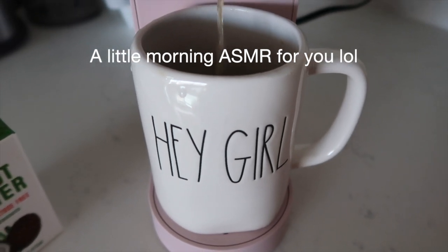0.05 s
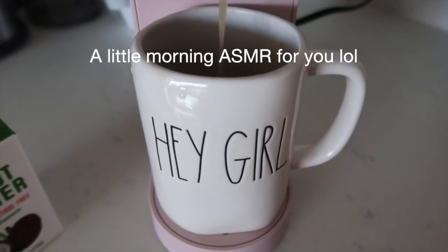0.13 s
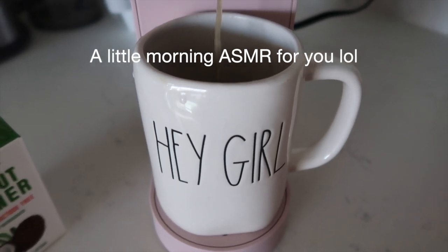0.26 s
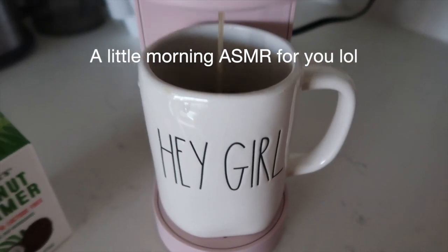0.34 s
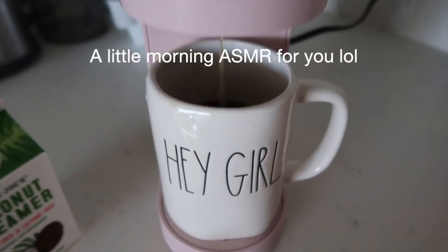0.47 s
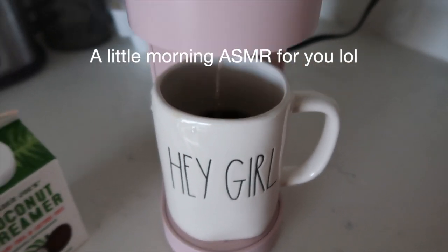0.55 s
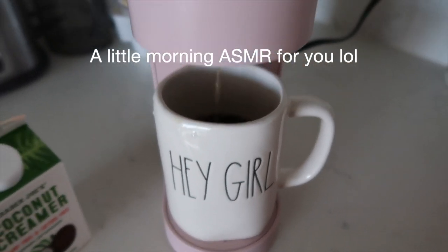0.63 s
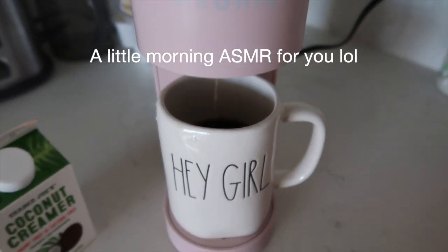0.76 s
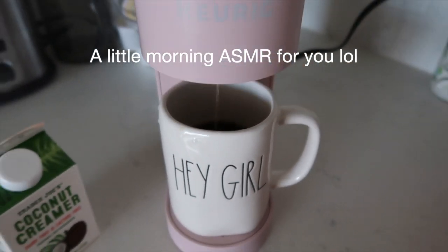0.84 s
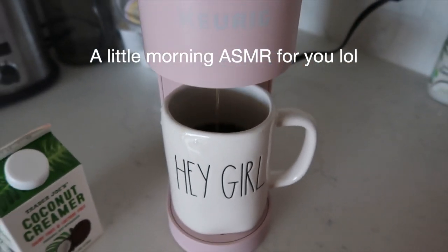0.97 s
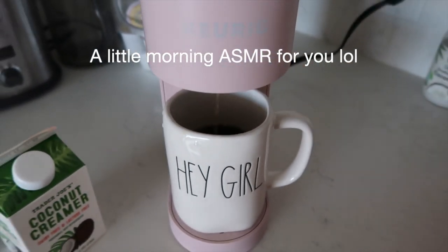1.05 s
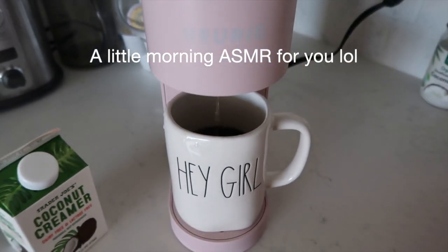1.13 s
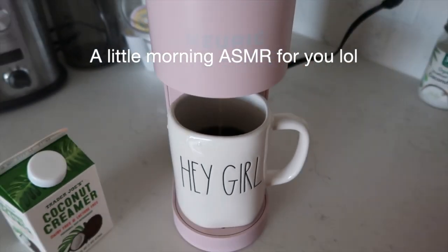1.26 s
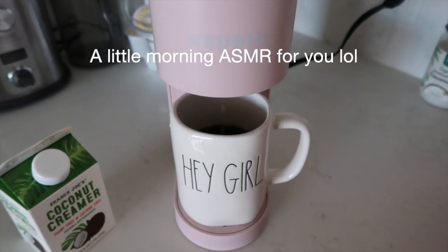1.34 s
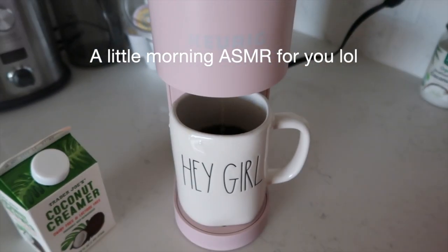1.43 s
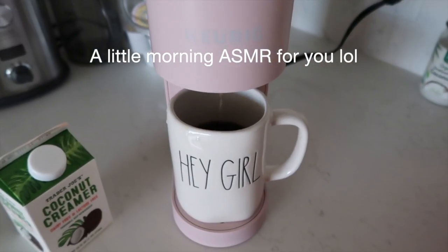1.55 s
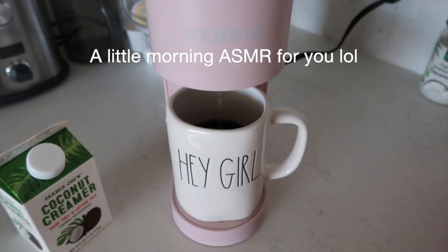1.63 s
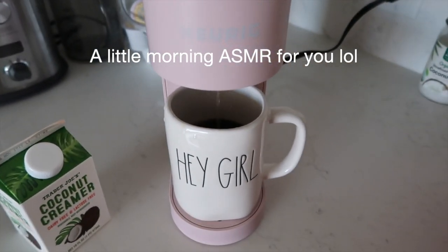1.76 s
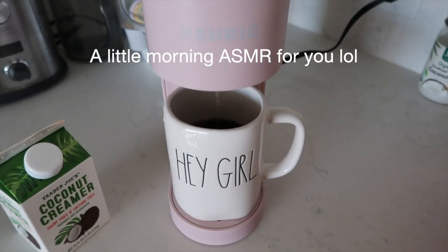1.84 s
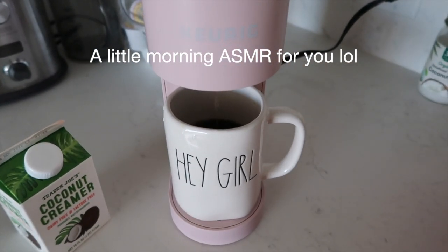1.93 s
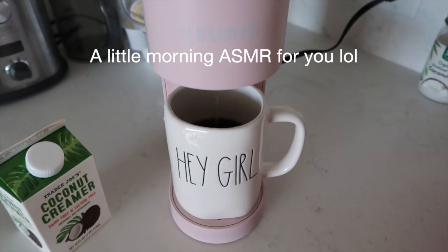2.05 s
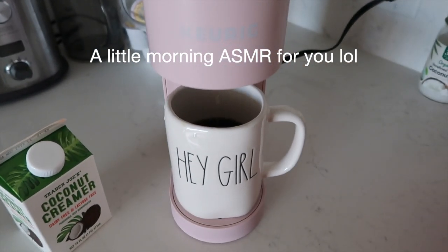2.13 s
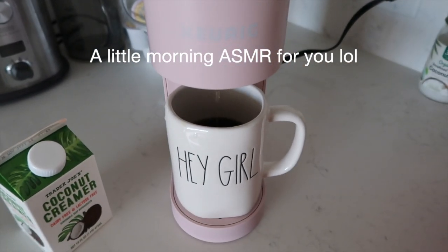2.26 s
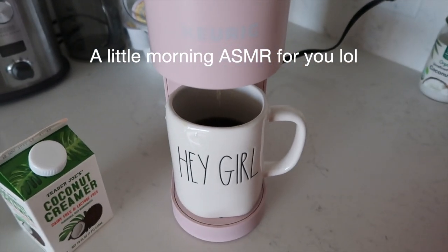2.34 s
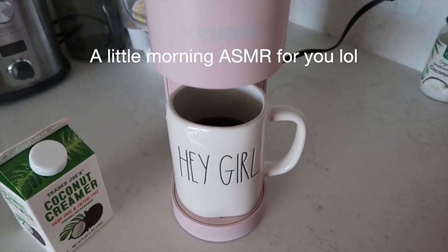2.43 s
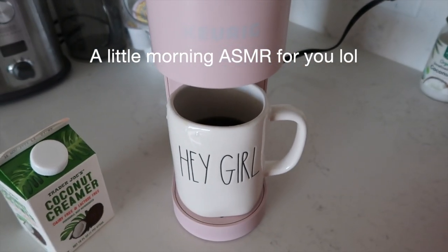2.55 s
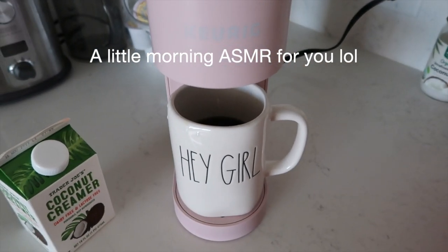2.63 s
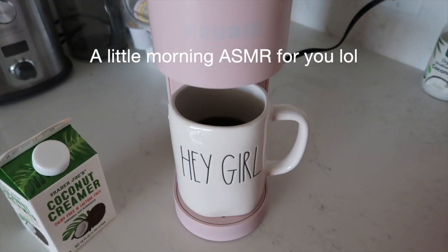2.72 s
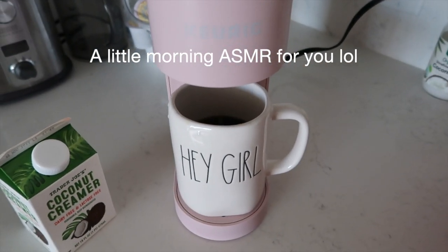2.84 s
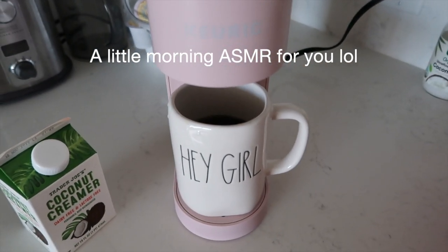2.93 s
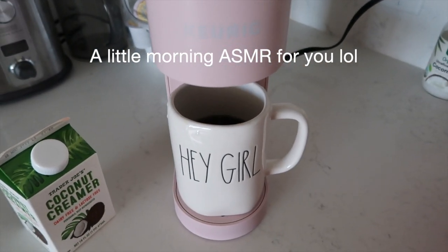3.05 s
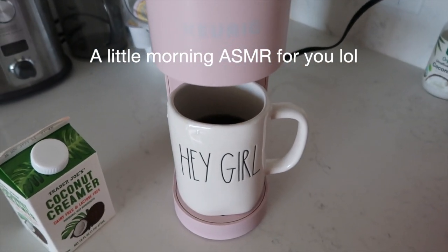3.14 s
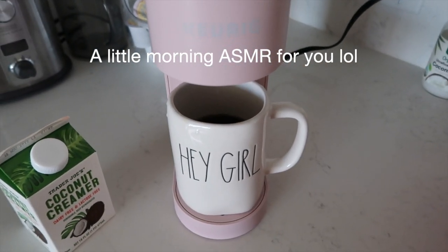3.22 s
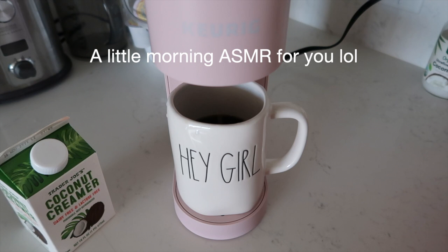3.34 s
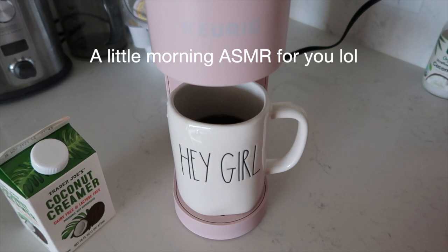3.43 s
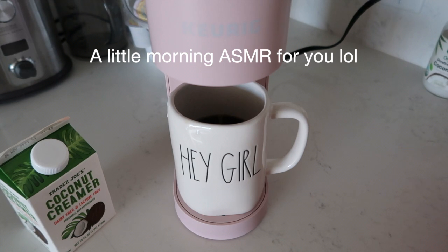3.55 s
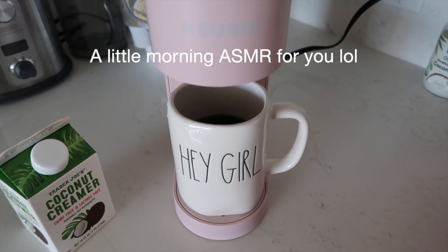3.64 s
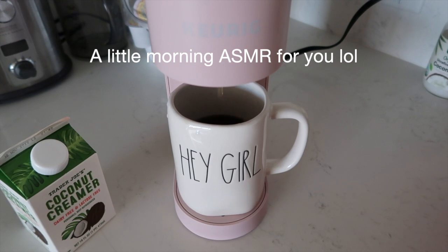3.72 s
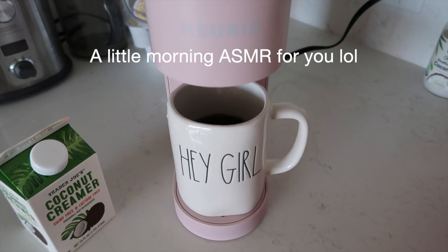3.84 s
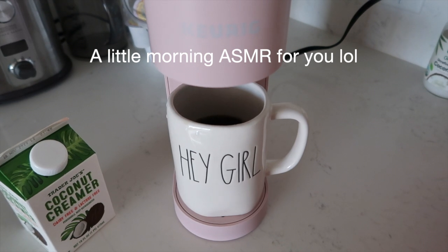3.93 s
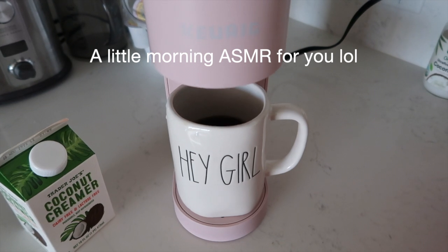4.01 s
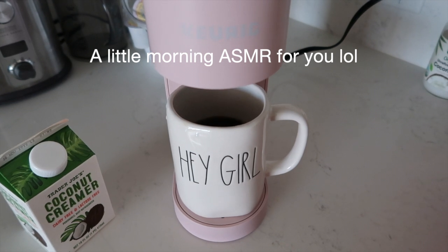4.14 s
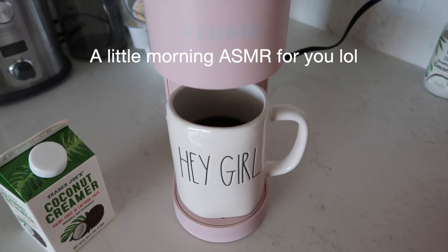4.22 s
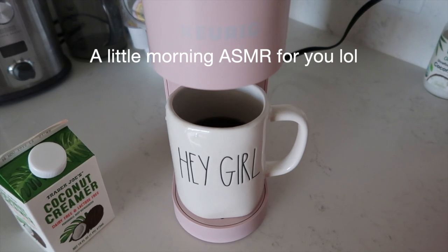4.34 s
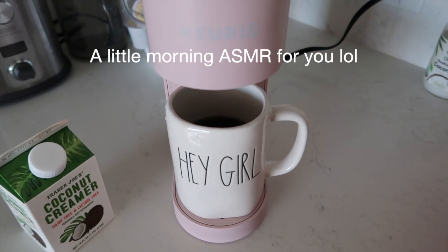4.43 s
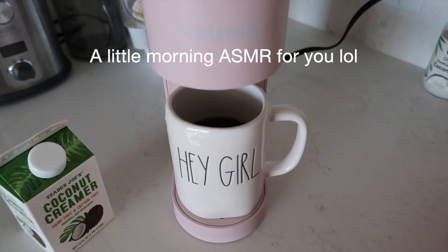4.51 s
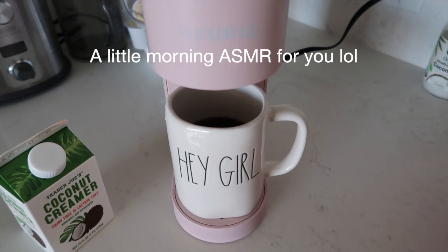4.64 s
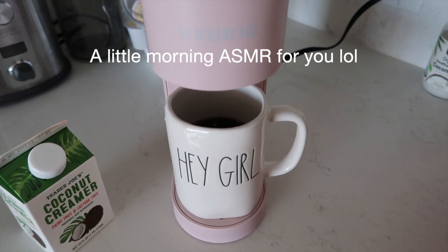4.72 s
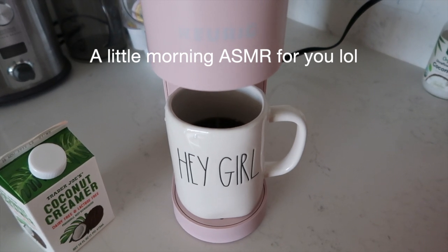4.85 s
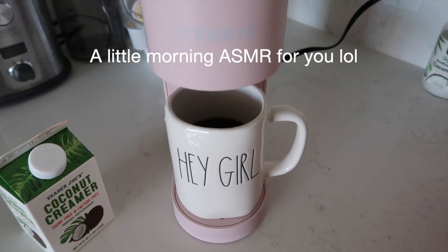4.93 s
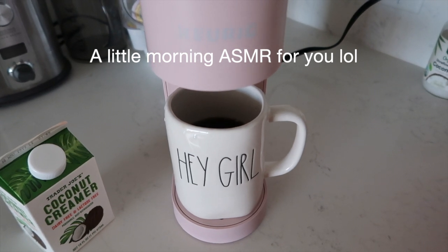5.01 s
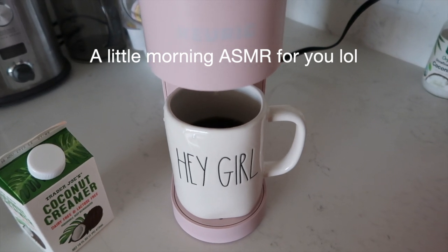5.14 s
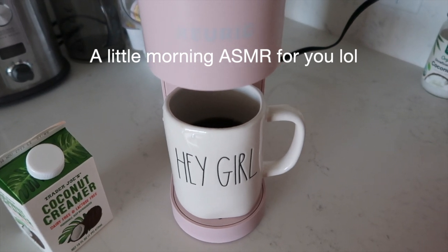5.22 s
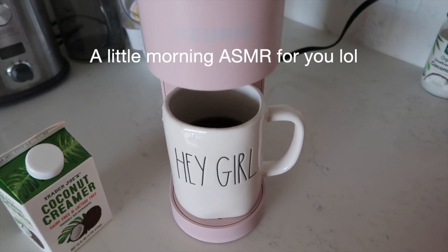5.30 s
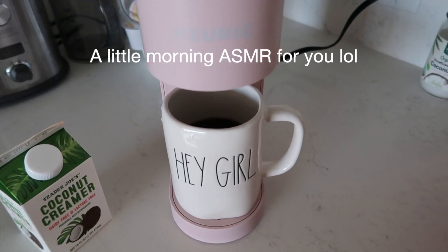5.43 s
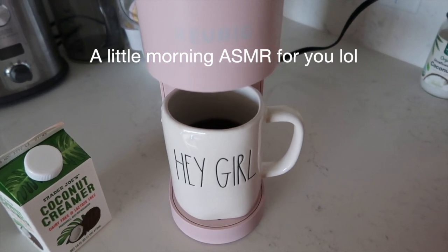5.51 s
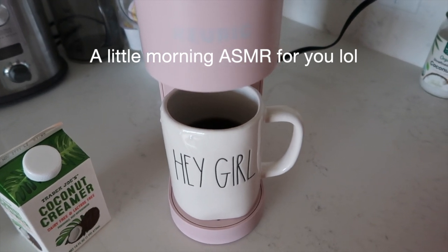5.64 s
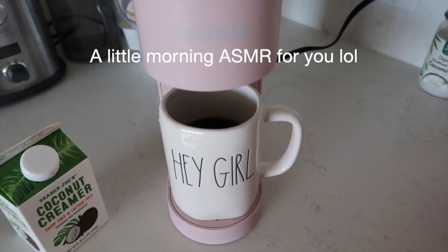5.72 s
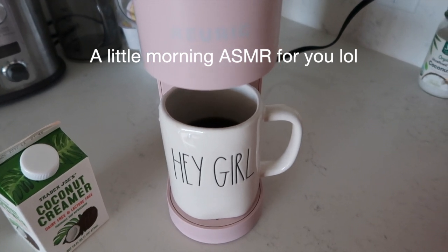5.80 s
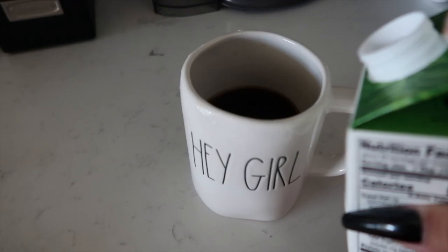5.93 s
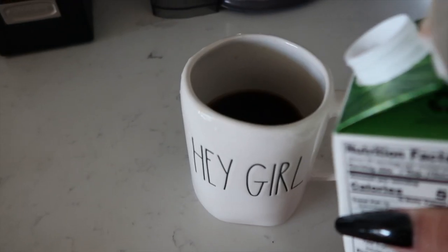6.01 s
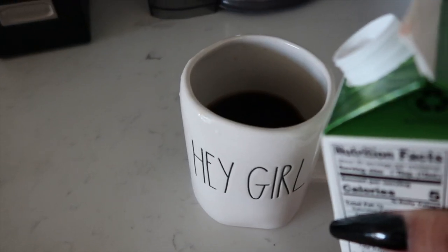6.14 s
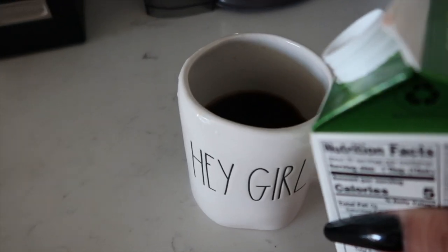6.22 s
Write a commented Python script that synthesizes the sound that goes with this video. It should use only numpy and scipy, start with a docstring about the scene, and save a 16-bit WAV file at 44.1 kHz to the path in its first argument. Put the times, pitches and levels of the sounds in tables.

```python
"""In a kitchen, a small coffee maker empties itself into a mug, close to two microphone ports.
Its pump hums while it blows the last water, then air, through the pod: shaped noise gives the spray
and hiss, damped tones the gurgle and bubbles. A relay clicks as ringing modes, the pump hum runs down and
the pressure sighs away as noise and whistles. A short silence, then quiet room tone with a faint high whine."""
import sys
import numpy as np
from scipy import signal
from scipy.fft import rfft, irfft, next_fast_len
from scipy.io import wavfile
from scipy.ndimage import uniform_filter1d, map_coordinates

SR = 44100
rng = np.random.default_rng(int(sys.argv[2]) if len(sys.argv) > 2 else 0)


def materialize(psi):
    """Save the field psi as 16-bit PCM at rate SR to the path in sys.argv[1].

    A 1-D psi becomes a single channel; in a 2-D psi each row is a channel.
    """
    bounded = np.clip(np.atleast_2d(psi).T, -1, 1)
    quanta = np.round(bounded * 32767).astype(np.int16)
    wavfile.write(sys.argv[1], SR, quanta)


N = 276507
TIME = np.arange(N) / SR

# The pump as it works and runs down: time_s, stroke_rate_hz, hum_db, buzz_db
PUMP_RUN = [(0, 95.43, -32.5, -36.5), (.7, 94.7, -34, -37.5), (1.2, 96.7, -37.5, -40.5),
            (1.6, 95.23, -37.5, -39.5), (2, 96.8, -37.5, -38.5), (2.8, 96.86, -37.5, -39),
            (3.5, 96.08, -38, -39), (4.3, 96.15, -36.5, -39.5), (4.9, 95.7, -37, -39.5),
            (4.95, 90.7, -34, -39), (5.0, 89.8, -43, -54), (5.06, 86, -50, -59), (5.2, 81.4, -53, -54)]
# A drop chokes the jet, then bursts: burst_s, choke_length_s, choke_depth_db, burst_level_db
DROP_SPITS = [(0.178, 0.007, 10, -38), (0.355, 0.047, 5, -26), (0.511, 0.026, 5, -40),
              (0.67, 0.022, 5, -30), (0.941, 0.015, 6, -27), (1.04, 0.015, 9, -30), (1.169, .02, 5, -33),
              (1.222, 0.04, 6, -45), (1.241, .02, 3, -33), (1.277, 0.017, 4, -39), (1.397, 0.054, 10, -35),
              (1.552, .02, 7, -28), (1.599, 0.028, 7, -43), (1.836, .03, 5, -36), (1.929, 0.033, 7, -38),
              (2.002, 0.095, 4, -41), (2.096, .02, 1, -37), (2.249, 0.067, 6.5, -49),
              (2.318, 0.019, 3, -40), (2.546, 0.039, 9, -41), (2.943, 0.03, 9, -44),
              (3.031, 0.05, 2.5, -34), (3.278, 0.11, 7.5, -60), (3.362, 0.021, 1, -43),
              (3.441, .02, -4, -32.5), (3.657, 0.091, 4.5, -37), (3.886, 0.053, 5, -50),
              (3.941, 0.018, -2, -34), (3.97, 0.014, 3, -34), (4.021, 0.024, 8, -44),
              (4.197, 0.18, 8.5, -31.5), (4.351, 0.053, 9, -51), (4.561, 0.028, 6, -41),
              (4.612, 0.022, 6, -57), (4.897, 0.024, 2, -60)]
# Likeness of the two ports for air, vent and murmur: frequency_hz, likeness (0-1)
AIR_LIKENESS = [(60, 0.99), (400, 0.98), (1500, 0.97), (2100, 0.94), (2500, 0.99), (3200, 0.95),
                (4000, 0.81), (4600, 0.99), (5100, 0.42), (6500, 0.28), (9000, 0.5), (11000, 0.29),
                (14500, .6)]
# The short silence: from_s, to_s
SILENT_SPAN = (5.855, 5.923)


def amp(db):
    """Decibels to gain."""
    return 10 ** (np.asarray(db) / 20)


def unit(x):
    """x at rms 1."""
    return x / np.sqrt(np.mean(np.abs(x) ** 2) + 1e-20)


def along(points, hz):
    """Interpolate (Hz, value) points on a log frequency axis."""
    f, v = np.transpose(points)
    return np.interp(np.log(hz + 1), np.log(f + 1), v)


def curves(rows):
    """One value per sample for each column after the time."""
    s, *cols = np.transpose(rows)
    return [np.interp(TIME, s, c) for c in cols]


def fade(start, length):
    """1 until start, then down to 0 over length, both in s."""
    return np.clip(1 - (TIME - start) / length, 0, 1)


def wobble(rate):
    """A smooth random curve, rate knots a second."""
    coarse = TIME[::32]
    knots = rng.standard_normal(int(N * rate / SR) + 4)
    return np.interp(TIME, coarse, map_coordinates(knots, [coarse * rate]))


def filtered(x, response):
    """x through a filter given as a real or complex function of frequency."""
    m = next_fast_len(N + SR // 4)
    return irfft(rfft(x, m) * response(np.fft.rfftfreq(m, 1 / SR)), m)[..., :N]


def resonant(peaks, base_db):
    """Gain of resonances standing on a flat base."""
    def gain(f):
        power = sum(amp(2 * db) / (1 + (2 * (f - c) / w) ** 2) for c, w, db in peaks)
        return np.sqrt(amp(2 * base_db) + power)
    return gain


def band(lo_hz, hi_hz):
    """Gain of a band with soft edges."""
    return lambda f: 1 / np.sqrt((1 + (lo_hz / (f + 1)) ** 4) * (1 + (f / hi_hz) ** 4))


def rush(gain, alike, patchy_db):
    """Stereo noise of rms 1 with patches of random gain; a mid-side mix sets the likeness of the ports."""
    z = signal.stft(rng.standard_normal((2, N)), nperseg=512)[2]
    field = uniform_filter1d(rng.standard_normal(z.shape[1:]), size=6, axis=0)
    field = uniform_filter1d(field, size=6, axis=1)
    pair = signal.istft(z * amp(patchy_db * unit(field)), nperseg=512)[1][:, :N]

    def mid_side_gain(hz):
        turn = np.arccos(np.clip(along(alike, hz), -1, 1)) / 2
        return gain(hz) * np.array([np.cos(turn), np.sin(turn)])

    mid, side = filtered(pair, mid_side_gain)
    return unit(np.array([mid + side, mid - side]))


def narrow(hz, width_hz, steady):
    """Noise in a steep resonance whose centre follows the curve hz; steady 0-1 evens out its swells."""
    pole = np.exp(-np.pi * width_hz / SR)
    noise = rng.standard_normal(N) + 1j * rng.standard_normal(N)
    swell = signal.lfilter([1], [1, -2 * pole, pole * pole], noise)
    swell = swell / (np.abs(unit(swell)) + 0.35) ** np.clip(steady, 0, 1)
    return unit(np.real(swell * np.exp(2j * np.pi * np.cumsum(hz) / SR)))


def kitchen():
    """Steady noise as room tone, a little louder after the silence, with a whine, an airy tone and a tick."""
    # Colour of the room tone: frequency_hz, relative_level_db (per Hz)
    room_colour = [(12, -45), (25, -8.5), (60, -7.5), (85, 1.5), (125, -8.5), (170, -9.5), (230, -6.5),
                   (480, -12.5), (610, -19.5), (1240, -23), (2150, -29), (11600, -46), (14900, -62)]
    # Likeness of the ports for the room: frequency_hz, likeness (0-1)
    room_likeness = [(25, .999), (60, 1), (180, 0.9), (540, 0.5), (1610, 0.12), (14500, 0.18)]
    # Faint high whine: pitch_hz, level_db
    whine_tones = [(13006, -80)]
    # A fingernail on the carton: start_s, level_db
    nail_ticks = [(5.972, -52.5)]
    # Tones of the carton: pitch_hz, relative_level_db
    carton_tones = [(3500, 1), (3920, -2)]
    # Airy tone in the room: pitch_hz, width_hz, relative_level_db
    murmur_peaks = [(800, 150, -3), (1290, 70, 3)]
    # Level of the airy tone: time_s, level_db
    murmur_points = [(5.92, -64), (6.1, -63), (6.14, -72), (6.18, -62), (6.27, -67)]
    later = TIME > SILENT_SPAN[1]
    room = rush(lambda f: amp(along(room_colour, f)), room_likeness, patchy_db=0.0)
    room = amp(-46.5 + 0.52 * later) * room
    whine = sum(np.sqrt(2) * amp(db + .9 * wobble(30)) * np.sin(2 * np.pi * hz * TIME)
                for hz, db in whine_tones)
    tick = np.zeros(N)
    for s, db in nail_ticks:
        decay = (TIME > s) * amp(db - 60 * np.abs(TIME - s) / .03)
        tick += decay * sum(amp(level) * np.sin(2 * np.pi * hz * (TIME - s)) for hz, level in carton_tones)
    murmur = rush(resonant(murmur_peaks, base_db=-30), AIR_LIKENESS, patchy_db=2.5)
    murmur = amp(curves(murmur_points)[0]) * murmur
    return room + (whine + murmur) * later + tick


def relay():
    """Each contact rings the relay case and rattles for a moment; the plastic around it dulls the top."""
    # Contact and bounces: start_s, relative_level_db
    contacts = [(4.903, -4), (4.911, -27), (4.92, -27)]
    # Modes of the case: pitch_hz, relative_level_db, t60_s
    case_modes = [(776, -2, 0.042), (1050, -9, .03), (1401, -3, 0.025), (2225, -26, 0.15),
                  (3260, -10.5, 0.035), (3607, -14, 0.038), (5650, -30, 0.095), (6330, -23, 0.086),
                  (6864, -18, 0.11), (8700, -13, 0.06)]
    out, t = np.zeros((2, N)), TIME[:SR // 4]
    for s, db in contacts:
        ring = sum(amp(level - 60 * t / t60) * np.sin(2 * np.pi * hz * t) for hz, level, t60 in case_modes)
        # mostly common to both ports
        noise = rng.standard_normal(len(t)) + 0.14 * rng.standard_normal((2, len(t)))
        rattle = amp(-5.0 - 60 * t / 0.067) * noise
        start = round(s * SR)
        out[:, start:start + len(t)] += amp(db - 8.0) * (ring + rattle) * (1 - np.exp(-t / 0.002))
    return signal.lfilter(*signal.butter(2, 11000, fs=SR), out)


def sigh():
    """As the pump runs down, pressure leaks through the vent: fading noise with two faint whistles."""
    # Resonances of the vent: pitch_hz, width_hz, relative_level_db
    vent_peaks = [(300, 170, 12.5), (840, 550, 4.5), (1340, 180, 9), (3400, 790, -7.5), (2160, 46, 3),
                  (2650, 54, -3), (2930, 43, 2)]
    since = np.maximum(TIME - 4.93, 0)  # s
    vent = resonant(vent_peaks, base_db=-14.0)
    low = rush(lambda f: vent(f) * band(110, 4200)(f), AIR_LIKENESS, patchy_db=2.5)
    high = rush(band(2300, 5700), AIR_LIKENESS, patchy_db=1.5)
    whistle = narrow(1390 - 130 * since, width_hz=106, steady=.97)
    low_whistle = narrow(860 + 0 * since, width_hz=120, steady=.5)
    # starting levels in dB, falling in dB per s
    leak = amp(-37.5 - 40 * since) * low + amp(-44 - 120 * since) * high
    slackening_db = 6 * (1.0 - fade(5.13, 0.036))  # the whistle drops as the vent slackens
    leak += amp(-42.5 - 20 * since - slackening_db) * whistle
    leak += amp(-50 - 17 * since + 2.9 * wobble(30)) * low_whistle
    return leak * (1 - fade(4.905, 0.011)) * fade(5.33, 0.075)


def pump():
    """Five strokes a turn: a hum at the stroke rate, wavering overtones, and a faint thump of the shaft."""
    # The buzz: multiple_of_stroke_rate, relative_level_db
    buzz_orders = [(2, -27), (3, -0.5), (4, -22), (5, -16), (6, -15), (7, -16.5), (8, -16), (9, -5.5),
                   (10, -10.5), (11, -11), (12, -22), (13, -31), (14, -20), (15, -17.5), (16, -26),
                   (18, -15.5), (19, -19), (21, -22.5)]
    hz, hum_db, buzz_db = curves(PUMP_RUN)
    phase = 2 * np.pi * np.cumsum(hz) / SR
    buzz = np.zeros(N)
    for k, level in buzz_orders:  # higher orders waver more
        waver = 0.034 * k * wobble(25) + rng.uniform(0, 2 * np.pi)
        buzz += amp(level + 0.14 * k * wobble(12)) * np.sin(k * phase + waver)
    shaft = amp(-49.5 - 11 * np.abs(TIME - 4.3)) * np.sin(phase / 5)  # strongest at 4.3 s
    hum = amp(hum_db + 0.32 * wobble(25)) * np.sin(phase)
    return np.sqrt(2) * (hum + amp(buzz_db) * buzz + shaft) * fade(5.15, 0.1)


def gurgle():
    """A growing air pocket: its pitch sinks and it sounds in lumps; the spout's modes sing above it."""
    # Air pocket, sinking as it grows: time_s, pitch_hz, level_db
    pocket_points = [(0, 530, -40), (.3, 513.3, -36), (.6, 476.6, -38), (.86, 514, -29),
                     (.92, 494.3, -30.5), (.96, 469.5, -36), (1.03, 461, -31.5), (1.055, 465, -23.5),
                     (1.11, 487, -28.5), (1.14, 481, -24.5), (1.21, 477.5, -33), (1.25, 451, -23.5),
                     (1.29, 444, -23.5), (1.34, 448, -32.5), (1.37, 451.6, -24.5), (1.39, 457, -41),
                     (1.42, 462, -22), (1.47, 433.3, -29.5), (1.5, 426.6, -32), (1.57, 423.5, -30.5),
                     (1.61, 438, -36), (1.64, 430, -29), (1.74, 420.5, -38), (1.79, 454, -28.5),
                     (1.81, 440.4, -49), (1.85, 430.3, -32.5), (1.91, 386, -34), (1.94, 402, -34),
                     (2.04, 413.3, -35.5), (2.08, 419.5, -36), (2.12, 389.4, -32.5), (2.19, 418.4, -34),
                     (2.26, 390.7, -34.5), (2.3, 380, -43), (2.35, 397, -32.5), (2.39, 389, -44),
                     (2.46, 350.5, -38), (2.5, 344.5, -44), (2.6, 336.4, -44)]
    # How strongly the spout's modes sing: time_s, level_change_db
    song_points = [(0, 0), (.3, 0), (.45, -0.5), (.65, 1), (.95, -4.5), (1.1, -5), (1.3, -6), (1.45, -5),
                   (1.8, -8.5), (1.9, -13), (1.95, -12), (2.07, -15), (2.2, -4), (2.3, -10), (2.39, -13.5),
                   (2.48, -11.5), (2.6, -24)]
    # Spout modes: pitch_hz, drift_hz_per_s, width_hz, level_db, level_change_db_per_s
    pipe_modes = [(743, -30, 110, -29.5, 0.5), (885.4, 24, 52, -27, -1), (1520, -20, 107, -31, -1)]
    hz, db = curves(pocket_points)
    song_db, = curves(song_points)
    lumps = wobble(34.95)
    pocket_hz = hz + 9.6 * wobble(25.05)  # the pitch trembles
    pocket = amp(db + 1.4 * lumps) * narrow(pocket_hz, width_hz=56.4, steady=0.78)
    pipe = np.zeros(N)
    for mode_hz, drift, width_hz, level_db, slope_db in pipe_modes:
        swell = amp(level_db + slope_db * TIME + 1.5 * wobble(22.04))  # each mode swells on its own
        pipe += swell * narrow(mode_hz + drift * TIME + 14 * wobble(30), width_hz, steady=0.29)
    return (pocket + amp(song_db + 0.44 * lumps) * pipe) * fade(2.73, 0.27)


def froth(count=900):
    """Many small bubbles where the stream lands, ever fewer as it thins: brief tones dying 1.4 dB a cycle."""
    draw = rng.random((count, 4))
    start = (2.4 * draw[:, 0] ** 2 * SR).astype(int)
    hz = 480 * 4.04 ** draw[:, 1:2]
    size_db = -30 - 3 * np.log(draw[:, 2:3] + 0.089) - 5.8 * start[:, None] / SR
    cycles = hz * TIME[:SR // 25]
    envelope = amp(size_db - 1.4 * cycles) * (1 - np.exp(-cycles / 0.18))
    glide = 1 + 0.0166 * (draw[:, 3:] - .25) * cycles
    grains = envelope * np.sin(2 * np.pi * cycles * glide)
    return np.bincount((start[:, None] + np.arange(SR // 25)).ravel(), grains.ravel(), N)


def plops(rows, t60, rise):
    """Bubbles: damped tones with a soft start and a gliding pitch, each in a soft splash."""
    out, splash, t = np.zeros(N + SR), np.zeros(N + SR), TIME[:SR // 10]
    swell = (1 - np.exp(-t / 0.0037)) * amp(-60 * t / t60)
    swell *= np.clip(5 - 50 * t, 0, 1)  # closes smoothly by 0.1 s
    spill = (1 - np.exp(-t / 0.0031)) * amp(-14.5 - 60 * t / 0.14)
    for s, db, hz in rows:
        wander = np.cumsum(rng.standard_normal(len(t))) / 25  # the wall of the bubble trembles
        tone = np.sin(2 * np.pi * hz * t * (1 + rise * t) + 0.26 * wander)
        start = round(s * SR)
        out[start:][:len(t)] += amp(db) * swell / swell.max() * tone
        splash[start:][:len(t)] += amp(db) * spill
    splash_band = signal.butter(2, [260, 900], "band", fs=SR, output="sos")
    wet = signal.sosfilt(splash_band, rng.standard_normal(N))
    return out[:N] + splash[:N] * unit(wet)


def trailing(rows, count=3):
    """Each large bubble is followed by a few weaker ones, mostly higher, with scattered pitch."""
    draw = rng.random((len(rows), count, 3))
    return [(s + .015 + .07 * a, db - 9 - 6 * b, hz * np.exp(.3 * (3 * c - 1)))
            for (s, db, hz), some in zip(rows, draw) for a, b, c in some]


def counter(x):
    """The counter's short scattered echo: decaying noise convolved in, opposite at the two ports."""
    t = TIME[:SR // 10]
    tail = rng.standard_normal(len(t)) * amp(-60 * t / .05)
    echo = amp(-23) * signal.fftconvolve(x, tail / np.linalg.norm(tail))[:N]
    return np.array([x + echo, x - echo])


def bubbling():
    """Trapped air rings in the water: gurgle, froth, single bubbles and last drops, with the counter's echo."""
    # Single large bubbles: start_s, peak_db, pitch_hz
    large_bubbles = [(.034, -20, 710), (.043, -22, 1530), (.205, -19.5, 915), (.21, -20, 1145),
                     (.21, -19, 1320), (.28, -21.5, 730), (.285, -26, 1316), (.397, -18, 1323),
                     (.545, -18.5, 723), (1.052, -23, 462), (1.125, -20, 487), (.058, -14.5, 880),
                     (.18, -12, 722), (.231, -14, 730), (.343, -12, 888), (.369, -18.5, 718),
                     (.561, -19.5, 439), (.619, -19, 883), (.658, -27, 750), (.81, -18, 902),
                     (.886, -20, 929), (.865, -22, 560), (1.05, -23.5, 702), (1.088, -17, 900),
                     (1.41, -21.5, 924), (1.62, -24, 936), (1.822, -21, 421), (1.928, -24.5, 927),
                     (2.003, -18, 419), (2.133, -23, 376.6), (2.171, -21.5, 423.3), (2.235, -25, 352),
                     (2.27, -29, 672), (2.279, -25.5, 301), (2.435, -27, 451), (2.46, -25.5, 320.6),
                     (2.47, -29.5, 672), (2.47, -34, 940), (2.69, -25.5, 322.7), (2.692, -28, 663),
                     (2.88, -35, 656), (3.1, -30.5, 328.5), (3.11, -31, 475), (3.145, -28, 290),
                     (3.17, -34.5, 467), (3.191, -23.5, 314), (3.215, -27, 300), (3.191, -35, 664),
                     (3.24, -28.5, 428), (3.56, -30.5, 422.4), (3.77, -33.5, 1145), (3.8, -39, 1090),
                     (3.85, -35, 1119), (4.23, -32.5, 1117)]
    # Last drops: start_s, peak_db, pitch_hz
    last_drops = [(5.004, -38, 1344), (5.125, -37, 1420), (5.23, -48, 1760), (5.35, -50, 1130)]
    # Longer bubbles that slide: start_s, peak_db, pitch_hz, glide_per_s
    sliding_bubbles = [(.008, -16, 521, 5.5), (.085, -23, 640, -3.5), (.352, -24.5, 868, -3.5),
                       (.385, -23.5, 623, -3.5), (.595, -23.5, 928, -1.2), (1.045, -26.5, 900, 0.1)]
    wet = gurgle() + froth()
    wet += plops(large_bubbles, t60=0.081, rise=0.92)
    wet += plops(trailing(large_bubbles), t60=0.036, rise=5)
    wet += plops(last_drops, t60=0.064, rise=-0.25)
    wet += sum(plops([row[:3]], t60=0.28, rise=row[3]) for row in sliding_bubbles)
    return counter(wet)


def chokes():
    """Level change in dB at the nozzle: down while a drop blocks it, up just after as pent-up air escapes."""
    out = np.zeros(N)
    for s, length, depth_db, _ in DROP_SPITS:
        closing = np.clip((TIME - s + length) / length, 0, 1)
        opening = np.clip((TIME - s) / 0.0056, 0, 1)
        rebound = 0.069 * opening * np.exp(-np.abs(TIME - s) / 0.021)  # share of the depth
        out += depth_db * (rebound - closing * (1 - opening))
    return out


def air():
    """Air hisses out in uneven puffs over a steadier drone; drops choke it and burst in it."""
    # Level of the air jet: time_s, level_db
    jet_level = [(0, -44), (.5, -39), (1, -38.5), (1.5, -40), (2.5, -41), (3.5, -41.5), (4.2, -41),
                 (4.9, -42)]
    # Colour of the jet: frequency_hz, relative_level_db (per Hz)
    jet_colour = [(65, -50), (110, -17), (130, -27), (156, -30), (283, -9.5), (410, -14.5), (728, -19),
                  (858, -12), (913, -16.5), (1320, -15.5), (1620, -20.5), (2210, -22), (3840, -22.5),
                  (4440, -21.5), (14900, -48.5)]
    # Resonances of the plastic shell: pitch_hz, width_hz, relative_level_db
    shell_peaks = [(237, 24, 10.5), (1104, 25, 2.5), (1324, 36, 6), (1697, 34, 2.5), (2238, 88, 8.5),
                   (2643, 32, 6.5), (3270, 12, 10), (3540, 20, 6.5), (4430, 80, 1), (4330, 110, 7.5),
                   (4484, 91, 10.5), (4750, 130, 3), (4830, 30, 6), (5010, 79, 4.5), (5380, 420, -0.5),
                   (7340, 140, 0), (7800, 270, -3), (8870, 120, 4.5)]
    # The jet's edge around 5 to 6 kHz: time_s, level_db
    edge_points = [(2, -58.5), (3.4, -59), (3.7, -53.5), (3.93, -54), (4.1, -56), (4.25, -50), (4.5, -55),
                   (4.8, -52), (4.9, -55)]
    db, = curves(jet_level)
    # the pump pushes twice a stroke
    strokes = np.sin(4 * np.pi * np.cumsum(curves(PUMP_RUN)[0]) / SR + 1.2 * wobble(19))
    shell = resonant(shell_peaks, base_db=0.5)
    colour = lambda f: amp(along(jet_colour, f)) * shell(f)
    high = rush(lambda f: colour(f) * band(2600, 30000)(f), AIR_LIKENESS, patchy_db=1.1)
    low = rush(lambda f: colour(f) * band(30, 2600)(f), AIR_LIKENESS, patchy_db=1.44)
    choke_db = chokes()
    flutter_db = 1.6 * np.tanh(wobble(70)) + 1.8 * wobble(130) + .9 * strokes + 0.21 * wobble(15)
    puffs = amp(db + choke_db + flutter_db)
    after = TIME[:SR // 20]
    for s, _, _, burst_db in DROP_SPITS:
        burst = amp(burst_db - 60 * after / 0.033) * (1 - np.exp(-after / 0.00049))
        puffs[round(s * SR):][:len(after)] += burst
    drone_db = db + 3.5 + 0.078 * choke_db + 0.74 * wobble(16)  # the shell drones more evenly than the jet
    edge_db, = curves(edge_points)
    edge = rush(lambda f: band(5000, 6000)(f) ** 3, AIR_LIKENESS, patchy_db=3.0)
    edge = amp(edge_db + choke_db + 1.7 * wobble(45)) * edge
    return (puffs * high + edge + amp(drone_db) * low) * fade(4.885, 0.066)


def spray():
    """Water and steam forced through the pod ring its chamber; the nozzle's fizz dies band by band."""
    # Water through the pod: time_s, level_db
    flow_points = [(0, -20), (.2, -20.5), (.4, -21.5), (.5, -24), (.8, -28.5), (1.03, -34), (1.1, -31.5),
                   (1.4, -38.5), (1.65, -38.5), (2.05, -60), (2.19, -32.5), (2.3, -55), (2.6, -46)]
    # Pod chamber and mug: pitch_hz, width_hz, relative_level_db
    chamber_peaks = [(540, 140, 2.5), (1012, 29, 3), (1115, 18, -10), (1345, 28, 2), (1945, 31, 1.5),
                     (2478, 234, 1), (3270, 31, -24.5), (4130, 214, -3), (4340, 140, -21.5)]
    # Resonances of the nozzle: pitch_hz, width_hz, relative_level_db
    nozzle_peaks = [(5570, 170, 1.5), (6500, 55, 5), (7000, 180, -1.5), (7650, 150, -2), (8010, 150, -0.5),
                    (8480, 120, -6.5), (10500, 740, -5), (11170, 300, 2), (12200, 700, -2),
                    (13460, 700, -1)]
    # Likeness of the ports for the spray, close by: frequency_hz, likeness (0-1)
    near_likeness = [(400, 0.99), (1500, 0.98), (2100, 1), (3200, .999), (4100, 0.93), (4700, 1),
                     (5100, 0.4), (6500, 0.85), (7600, 0.53), (8600, 0.53), (9600, .15), (10600, 0.98),
                     (12000, 0.68), (14000, .2)]
    body_db, = curves(flow_points)
    choke_db = chokes()
    sink_db = 32.5 * np.tanh(np.maximum(TIME - 0.33, 0) / 1.6)  # the fizz is full until 0.33 s
    surge = wobble(22.8)
    chamber, nozzle = resonant(chamber_peaks, base_db=-15.0), resonant(nozzle_peaks, base_db=-27.0)
    body = rush(lambda f: chamber(f) * band(420, 4500)(f) ** 2, near_likeness, patchy_db=1.5)
    fizz = rush(lambda f: nozzle(f) * band(4800, 14000)(f) ** 3, near_likeness, patchy_db=1.1)
    top = filtered(fizz, lambda f: f > 9300)
    crest = filtered(fizz, lambda f: f > 11700)
    # the middle band sinks fastest, the crest slowest
    sinking = amp(-sink_db) * (fizz - top)
    sinking += amp(0.8 - 1.4 * sink_db) * (top - crest)
    sinking += amp(-0.5 - 0.97 * sink_db) * crest
    body = amp(body_db + 0.53 * choke_db + 0.59 * surge) * body
    sinking = amp(-29.5 + choke_db + 0.56 * surge) * sinking
    return (body + sinking) * fade(2.48, 0.38)


def scene():
    """The machine reaches the two ports with a phase lead; the room does not."""
    # How far the left port leads: frequency_hz, phase_rad
    left_lead = [(120, 0), (200, .06), (350, .1), (700, 0), (3400, 0), (4650, -.2), (5170, -1.1),
                 (5860, -.7), (6550, .1), (7600, -.4), (8600, 0), (9650, .3), (10700, 1.2), (14500, 1.4)]
    machine = relay() + sigh() + pump() + bubbling() + air() + spray()
    led = filtered(machine, lambda f: np.exp(.5j * along(left_lead, f) * [[1], [-1]]))
    return kitchen() + led


def record(dry):
    """A gap of silence, and a treble that rolls off to nothing at 15250 Hz."""
    gap = (TIME > SILENT_SPAN[0]) & (TIME < SILENT_SPAN[1])
    return filtered(dry * ~gap, lambda hz: np.clip((15250 - hz) / 600, 0, 1) ** 2) * ~gap


dry = scene()
out = record(dry)
materialize(out)
```